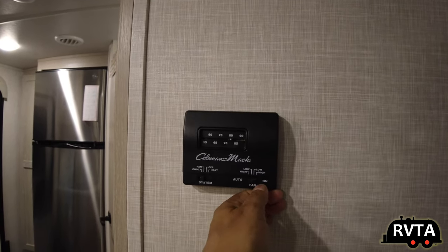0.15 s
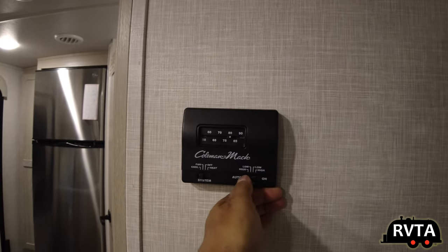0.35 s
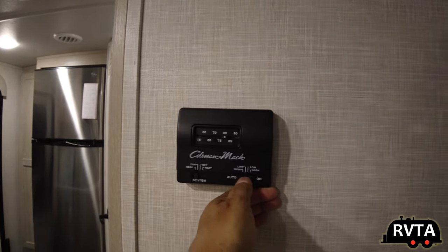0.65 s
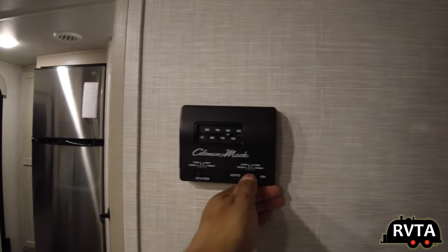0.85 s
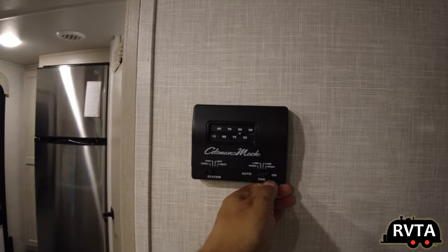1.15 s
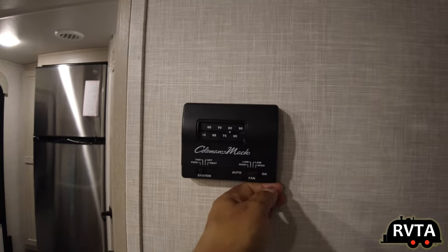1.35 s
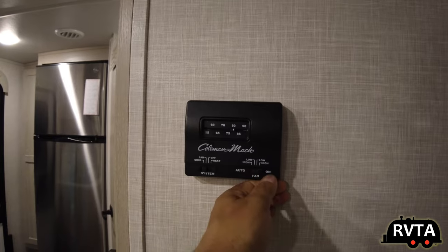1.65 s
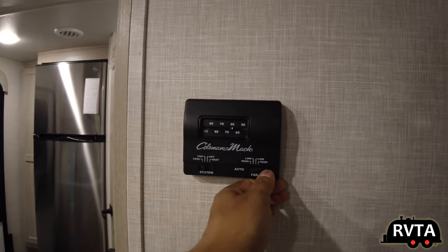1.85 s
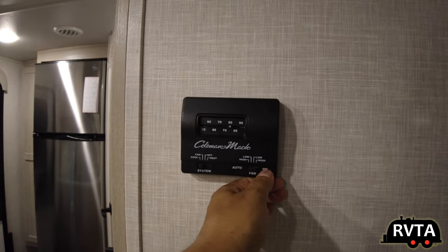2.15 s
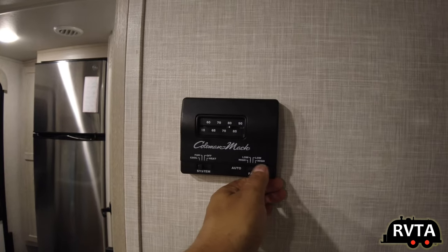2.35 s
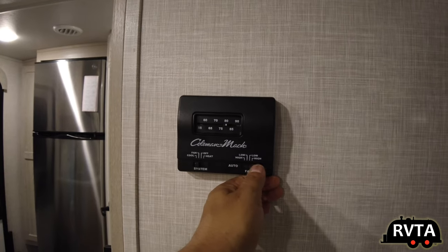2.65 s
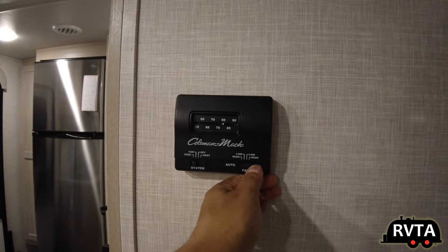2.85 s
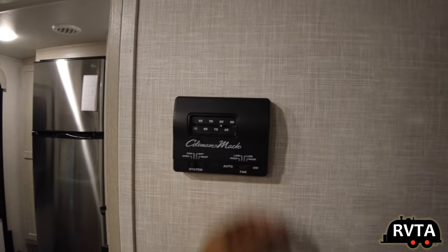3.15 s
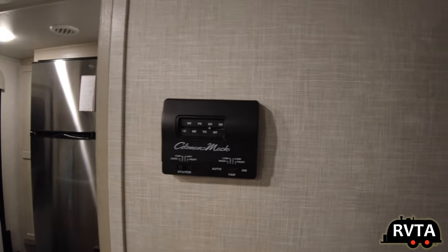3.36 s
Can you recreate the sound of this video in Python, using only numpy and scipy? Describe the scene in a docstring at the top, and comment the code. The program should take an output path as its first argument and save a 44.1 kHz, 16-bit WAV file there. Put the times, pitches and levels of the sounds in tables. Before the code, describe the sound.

A rooftop air conditioner hums with a low beating drone and rushing duct air in a small trailer; a close, sharp plastic switch click comes early, then the blower speeds up and faint ticks follow.

```python
"""A rooftop air conditioner runs in a small trailer: sine tones of mains hum beat with the compressor's,
a blower drones on multiples of its shaft rate, and shaped noise is the air rushing through ceiling ducts.
A thumb snaps the thermostat's plastic fan switch over: impulses ring the housing, the cabin echoes and a low
thump follows, while the blower winds up a step and the air grows louder and hissier.
The thumb then rests on the switch with a faint rub and a few ticks, which are filtered impulses."""
import sys
import numpy as np
from scipy import signal
from scipy.fft import rfft, irfft
from scipy.io import wavfile

SR = 44100
rng = np.random.default_rng(int(sys.argv[2]) if len(sys.argv) > 2 else 0)


def output_pcm(signal):
    """Save a mono or channel-first signal as 16-bit PCM at the path in sys.argv[1].

    Samples are clipped to [-1, 1] before scaling.
    """
    pcm = np.clip(np.atleast_2d(signal).T, -1, 1) * 32767
    wavfile.write(sys.argv[1], SR, np.round(pcm).astype(np.int16))


N = 154350
T = np.arange(N) / SR   # time [s]
HZ = np.maximum(np.arange(N // 2 + 1) * SR / N, 1)   # frequency grid, kept above zero for logarithms
LEFT_RIGHT = np.array([[1], [-1]])   # sign of the side signal at each ear

SWITCH_S = 0.715   # the slider snaps into its detent
CONTACT_SIDE_DB = -0.5   # side relative to mid for rattle, echoes, ticks and rub
ECHOES_PER_S = 12000   # density of the cabin's reflections

# Modes of the plastic housing: (frequency [Hz], level [dB], t60 [s])
HOUSING_MODES = [(760, -39, 0.11), (1010, -35, 0.11), (1319, -42, 0.058), (1690, -20.5, 0.03),
                 (1760, -23, 0.013), (2700, -23.5, 0.028), (3036, -27, 0.03), (3980, -51, 0.027),
                 (5100, -37, 0.023), (6080, -47, .045), (7420, -46, .025), (9000, -34, 0.016)]
# Spectrum of a contact on the slider: (frequency [Hz], relative density [dB per Hz])
CONTACT_SPECTRUM = [(500, -16), (1600, -2), (2900, 4), (3600, -1.5), (4400, -7.5), (6000, -2.5), (8800, -5),
                    (10500, -10.5), (13500, -6), (15500, -5)]


def from_db(db):
    """Level is logarithmic: decibels become an amplitude ratio."""
    return 10 ** (np.asarray(db) / 20)


def rms_one(x):
    """Normalise the effective value, the root of mean power, to 1."""
    return x / np.sqrt(np.mean(x ** 2) + 1e-20)


def level_at(points):
    """Linear interpolation in time of a (time [s], level [dB]) table."""
    return np.interp(T, *np.transpose(points))


def colour(points):
    """Interpolation over log frequency, as pitch is heard, of a two-column table starting with Hz."""
    hz, values = np.transpose(points)
    return np.interp(np.log(HZ), np.log(hz), values)


def band(points):
    """Band limiting: a spectrum that falls by 90 dB per octave outside its table."""
    octaves_below = np.maximum(np.log2(points[0][0] / HZ), 0)
    octaves_above = np.maximum(np.log2(HZ / points[-1][0]), 0)
    return colour(points) - 90 * (octaves_below + octaves_above)


def bump(hz, width_hz, height):
    """Resonance or notch as a Gaussian over frequency; the width is its half-width at 1/e."""
    return height * np.exp(-((HZ - hz) / width_hz) ** 2)


def bumps(rows):
    """Superposition of several resonances."""
    return sum(bump(*row) for row in rows)


def drift(rate_hz):
    """Low-pass random fluctuation with rms 1, its amplitude spectrum halved at the given rate."""
    spectrum = rfft(rng.standard_normal(N))
    return rms_one(irfft(spectrum / (1 + (HZ / rate_hz) ** 2), N))


def dying(start, t60):
    """Exponential decay after a sudden start, losing 60 dB in t60 seconds."""
    return (T >= start) * from_db(-60 * np.maximum(T - start, 0) / t60)


def settling(start, seconds):
    """First-order lag: an exponential approach from 0 towards 1."""
    return 1 - np.exp(-np.maximum(T - start, 0) / seconds)


def noise(shape_db, side_db):
    """Random-phase noise with mid rms 1; a quadrature share of the side makes one ear lead."""
    # Share of the side coherent with the mid, positive where the left leads: (frequency [Hz], share)
    left_lead = [(100, .5), (200, 0.99), (300, 1), (400, .65), (650, 0.56), (1000, .35), (1600, .3),
                 (2500, .5), (4000, 0.56), (7000, 0), (12000, 0.014)]
    mid, diffuse = from_db(shape_db) * np.exp(2j * np.pi * rng.random((2, len(HZ))))
    share = np.clip(colour(left_lead), -1, 1)
    side = from_db(side_db) * (1j * share * mid + np.sqrt(1 - share ** 2) * diffuse)
    mid, side = irfft([mid, side], N)
    return (mid + side * LEFT_RIGHT) / np.std(mid)


def tone(turns, db):
    """Sine with slight amplitude modulation; a quadrature side part sets the ears apart in phase."""
    waver_db, waver_hz, side_db = 0.37, 4, -19
    phase = 2 * np.pi * turns
    amplitude = np.sqrt(2) * from_db(db + waver_db * drift(waver_hz))
    return amplitude * (np.sin(phase) + from_db(side_db) * np.cos(phase) * LEFT_RIGHT)


def click(s):
    """Unit impulse, which excites all frequencies equally."""
    return 1.0 * (np.arange(N) == int(s * SR))


def grains(per_s, side_db):
    """Shot noise: random stereo impulses of uneven size, mid and side of joint rms 1 before the side gain."""
    hits = rng.random((2, N)) < per_s / SR
    mid, side = rms_one(hits * rng.standard_normal((2, N)))
    return mid + from_db(side_db) * side * LEFT_RIGHT


def through(x, shape_db):
    """Minimum-phase filtering at unit mean power: a folded cepstrum keeps energy near the onset."""
    floored_db = np.maximum(shape_db, shape_db.max() - 60)
    cepstrum = irfft(np.log(from_db(floored_db)), N)
    response = np.exp(rfft(2 * cepstrum[:N // 2], N))
    return irfft(rfft(x) * response / np.sqrt(np.mean(np.abs(response) ** 2)), N)


def ring(clicks, modes):
    """Modal synthesis: impulses excite damped two-pole resonators."""
    out = 0
    for hz, db, t60 in modes:
        radius = from_db(-60 / (t60 * SR))
        angle = 2 * np.pi * hz / SR
        poles = [1, -2 * radius * np.cos(angle), radius * radius]
        out = out + from_db(db) * signal.lfilter([0, np.sin(angle)], poles, clicks + 1e-18)
    return out


def motors():
    """Beating: mains hum and the compressor, slipping just behind it, reinforce and cancel in turn."""
    mains_hz, compressor_hz = 60, 58.585
    in_step_s = 0.12   # the two hums are in phase here
    # Tones of the mains hum: (multiple, level [dB])
    mains_tones = [(1, -43), (2, -28.5), (6, -47)]
    # Tones of the compressor: (multiple, level [dB])
    compressor_tones = [(1, -43), (2, -38.5)]
    out = 0
    for hz, tones in ((mains_hz, mains_tones), (compressor_hz, compressor_tones)):
        for multiple, db in tones:
            out = out + tone(multiple * hz * (T - in_step_s), db)
    return out


def blower(speed):
    """Rotating imbalance: the wheel throbs once a turn and drones on harmonics of its shaft rate."""
    low_hz, high_hz = 26.45, 28.1   # turns per second before and after the switch
    wander_hz, wander_rate_hz = 0.0446, 4.4   # rms unsteadiness of the shaft rate and how fast it varies
    # Harmonics: (multiple of the shaft rate, level at low speed [dB], level at high speed [dB])
    blower_tones = [(4, -39, -42.5), (5, -30.5, -39), (6, -29, -38.5), (12, -50, -54.5)]
    # Once-a-turn throb: (time [s], level [dB])
    throb_level = [(0, -34.5), (.45, -25), (.88, -24.5), (1.0, -34.5), (2.2, -36), (3.45, -36)]
    shaft_hz = low_hz + (high_hz - low_hz) * speed + wander_hz * drift(wander_rate_hz)
    turns = np.cumsum(shaft_hz) / SR
    out = tone(turns, level_at(throb_level))
    for multiple, low_db, high_db in blower_tones:
        out = out + tone(round(multiple) * turns + rng.random(), low_db + (high_db - low_db) * speed)
    return out


def air(speed):
    """Turbulent flow noise: rumble, rush and vent noise follow the blower; the top hiss builds slowly."""
    # Levels at high speed and the change at low speed [dB]
    rumble_db, rush_db, vent_db = -28, -33.5, -63.5
    rumble_low_db, rush_low_db, vent_low_db = -2, -2, -2.5
    flicker_db, flicker_hz = 2.5, 25   # rms flutter of the vent noise and its rate
    low_rush_hz, low_rush_width_hz = 378, 70   # centre and half-width of a band of the rush
    # Spectra of the four noises: (frequency [Hz], relative density [dB per Hz])
    rumble_spectrum = [(15, -15.5), (22, -13), (42, -12), (62, -6), (88, -10.5), (105, -4), (132, -0.5),
                       (150, -4.5), (168, -6.5), (185, -14.5), (220, -14), (250, -24.5)]
    rush_spectrum = [(150, -34.5), (250, -16.5), (273, -0.5), (308, -9), (364, -2.5), (411, -3),
                     (439, -11.5), (496, -8.5), (542, -15), (605, -16.5), (646, -15), (690, -19.5),
                     (754, -19.5), (930, -24.5), (1160, -24.5), (1270, -19.5), (1460, -24.5), (1630, -21),
                     (1970, -28), (2130, -28.5), (2280, -33), (2970, -31.5), (3500, -42.5), (4550, -76.5),
                     (7700, -120)]
    vent_spectrum = [(2060, -29), (3500, -4), (4110, 5), (5010, -4.5), (5990, 2), (6630, -1.5),
                     (7140, -15.5), (7750, -2.5), (8500, -11), (9890, -12.5), (10500, -18.5), (13600, -44),
                     (22000, -120)]
    hiss_spectrum = [(10500, -29), (11100, -13), (12300, -14.5), (13400, -4.5), (14300, 0.5), (14800, -1),
                     (15100, -12), (15800, -5)]
    # Narrow resonances of duct and cabin: (frequency [Hz], width [Hz], height [dB])
    duct_modes = [(284.7, 10, 1), (331, 3.7, 2), (362, 8.4, 2.5), (409, 4.5, 3), (676, 5.7, 1.5),
                  (755, 18, 4), (888, 15, 5), (1232, 14, 2), (1635, 11, 3), (2550, 49, 4)]
    # Band of the rush around 378 Hz, whose level wanders irregularly by a few dB,
    # as random noise does: (time [s], level [dB])
    low_rush_level = [(.1, 1), (.3, -2.5), (.47, 4.5), (.7, -2.5), (.9, 2.5), (1.45, 1), (1.7, -2.5),
                      (1.9, 1.5), (2.2, 0), (2.39, 3), (2.55, -3), (3.3, 0)]
    # Top hiss, one list before the snap and one after: (time [s], level [dB])
    hiss_level = [
        [(0.03, -72), (0.118, -71), (0.68, -66)],
        [(0.85, -63), (2.17, -55), (3.45, -53)],
    ]
    # Stereo width: (frequency [Hz], side minus mid [dB])
    side_level = [(60, -22), (78, -28.5), (100, -23), (130, -28), (170, -21), (220, -3.5), (290, -6.5),
                  (380, -7.5), (490, -7), (640, 2), (830, 2), (1080, 6.5), (1410, -12), (1830, -3.5),
                  (2380, -2), (3100, -1), (4030, 1.5), (5240, 3.5), (6820, 4), (8870, 2.5), (11500, -0.5),
                  (15000, -3)]
    # Balance: (frequency [Hz], left minus right [dB])
    balance = [(60, -2), (99, 0.5), (160, -0.5), (270, 0.5), (450, 0.5), (740, 1.5), (1220, 2),
               (2010, -0.5), (3330, 1), (5500, 1.0), (9080, 1.0), (15000, 3)]

    width = colour(side_level)
    slack = 1 - speed
    hum_gap = bump(118, 8, -8)   # the rumble is weaker around the hum
    rumble = noise(band(rumble_spectrum) + hum_gap, width)
    rumble = rumble * from_db(rumble_db + rumble_low_db * slack)

    rush = noise(band(rush_spectrum) + bumps(duct_modes), width)
    rush = rush * from_db(rush_db + rush_low_db * slack)
    low_rush = irfft(rfft(rush) * bump(low_rush_hz, low_rush_width_hz, 1), N)
    rush = rush + low_rush * (from_db(level_at(low_rush_level)) - 1)

    vent_level = vent_db + vent_low_db * slack + flicker_db * drift(flicker_hz)
    vent = from_db(vent_level) * noise(band(vent_spectrum), width)
    hiss = from_db(level_at(np.vstack(hiss_level))) * noise(band(hiss_spectrum), width)

    # half of the level difference goes to each ear
    ear_gain = from_db(colour(balance) * LEFT_RIGHT / 2)
    return irfft(rfft(rumble + rush + vent + hiss) * ear_gain, N)


def thumb():
    """Impact and stick-slip: nail ticks with echoes ring the housing; skin rubs in tiny random jerks."""
    rub_s, rub_length_s, rub_db, rub_per_s = 0.996, 0.1, -63.5, 1700
    tail_db, tail_t60_s = -19.5, 0.071   # echoes of a tick
    ring_db = -5   # how strongly a tick rings the housing
    soft_hz = 2500   # the thumb's soft contact rings little above this
    octaves = 1.0   # a tick's spectrum is 10 dB down this far from its centre
    # Ticks: (time [s], level [dB], centre frequency [Hz])
    tick_events = [(0.874, -37, 8000), (0.963, -24, 1000), (0.973, -42, 8000), (0.989, -21, 1300),
                   (1.023, -19, 1290), (1.073, -23, 1690), (1.179, -38.5, 9500), (3.002, -19.5, 1090)]
    rub_swell = np.exp(-((T - rub_s) / rub_length_s) ** 2)
    jerks = grains(rub_per_s, CONTACT_SIDE_DB) * rub_swell
    out = from_db(rub_db) * through(jerks, band(CONTACT_SPECTRUM))
    soft = signal.butter(2, soft_hz, fs=SR, output="sos")
    for s, db, hz in tick_events:
        echoes = dying(s, tail_t60_s) * grains(ECHOES_PER_S, CONTACT_SIDE_DB)
        tick = click(s) + from_db(tail_db) * echoes
        out += from_db(db) * through(tick, -10 * (np.log2(HZ / hz) / octaves) ** 2)
        out += ring(from_db(db + ring_db) * signal.sosfilt(soft, tick), HOUSING_MODES)
    return out


def switch():
    """Impulsive excitation: contacts crack, ring the housing and stir cabin echoes; a thump follows."""
    slide_db, slide_s = -30, 0.003   # the scrape grows exponentially towards the detent
    rattle_db, rattle_per_s, rattle_t60_s = -15.5, 4000, 0.021   # the slider chatters as it settles
    crack_db = -8
    cabin_db, cabin_t60_s, cabin_build_s = -28, 0.16, 0.002
    thump_s = 0.82
    # Contacts within the snap: (time after the snap [s], level [dB])
    snap_contacts = [(0.0001, -1), (.00038, 3), (.00105, -2), (.0024, -8.5), (.0038, -11)]
    # The cabin's answer: (frequency [Hz], relative density [dB per Hz])
    cabin_spectrum = [(500, 3), (1000, 0), (1700, -1.5), (2200, -13.5), (3000, 2.5), (3700, -9),
                      (4600, -16.5), (6000, -8.5), (7000, -18), (8000, -12), (9300, -19.5), (12000, -18.5),
                      (14000, -14), (15500, -18)]
    # Notes that stand out in the cabin's echoes: (frequency [Hz], width [Hz], height [dB])
    cabin_modes = [(2970, 90, 3), (5100, 80, 5), (6110, 100, 8), (7550, 60, 5), (8090, 90, 4),
                   (10700, 100, 5)]
    # Low thump: (frequency [Hz], level [dB], t60 [s])
    thump_modes = [(31, -26, .4), (56, -23, 0.29), (86, -24, 0.13), (132, -15.5, 0.069)]

    contacts = sum(from_db(db) * click(SWITCH_S + after) for after, db in snap_contacts)
    slide = from_db(slide_db) * (T < SWITCH_S) * np.exp(-np.abs(T - SWITCH_S) / slide_s)
    chatter = from_db(rattle_db) * dying(SWITCH_S, rattle_t60_s)
    rattle = (slide + chatter) * grains(rattle_per_s, CONTACT_SIDE_DB)
    crack = from_db(crack_db) * through(contacts + rattle, band(CONTACT_SPECTRUM))

    echo_envelope = dying(SWITCH_S, cabin_t60_s) * settling(SWITCH_S, cabin_build_s)
    echoes = grains(ECHOES_PER_S, CONTACT_SIDE_DB) * echo_envelope
    cabin = from_db(cabin_db) * through(echoes, band(cabin_spectrum) + bumps(cabin_modes))
    return ring(contacts, HOUSING_MODES) + crack + cabin + ring(click(thump_s), thump_modes)


def scene():
    """Linear superposition of the machine overhead and the switch close by."""
    speed = settling(SWITCH_S, 0.2234)   # 0 = low, 1 = high; time constant in seconds
    return motors() + blower(speed) + air(speed) + thumb() + switch()


def record(dry):
    """Low-pass filtering: an elliptic filter cuts the top steeply above 15.8 kHz."""
    return signal.sosfilt(signal.ellip(12, 0.1, 80, 15800, fs=SR, output="sos"), dry)


dry = scene()
out = record(dry)
output_pcm(out)
```